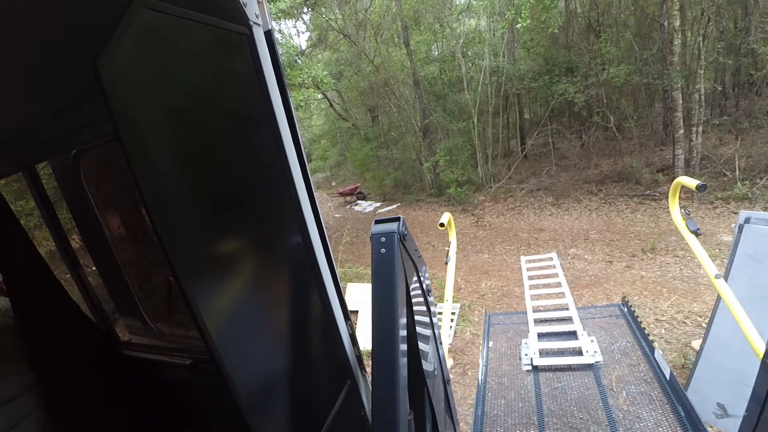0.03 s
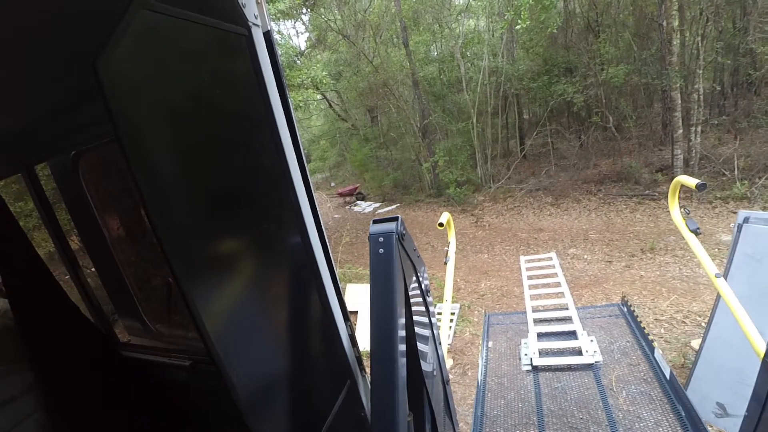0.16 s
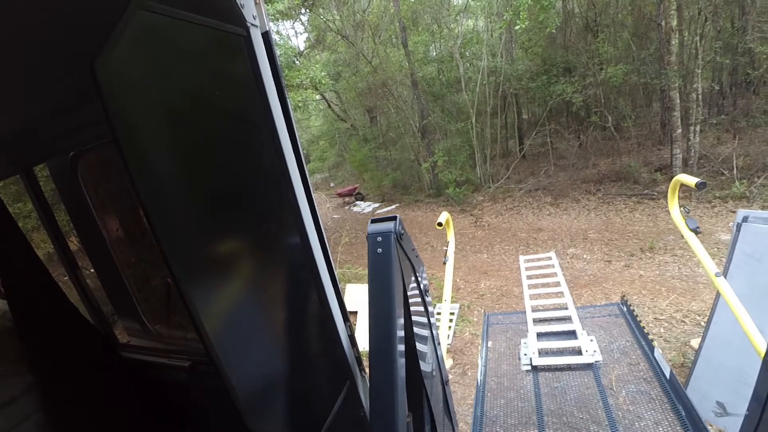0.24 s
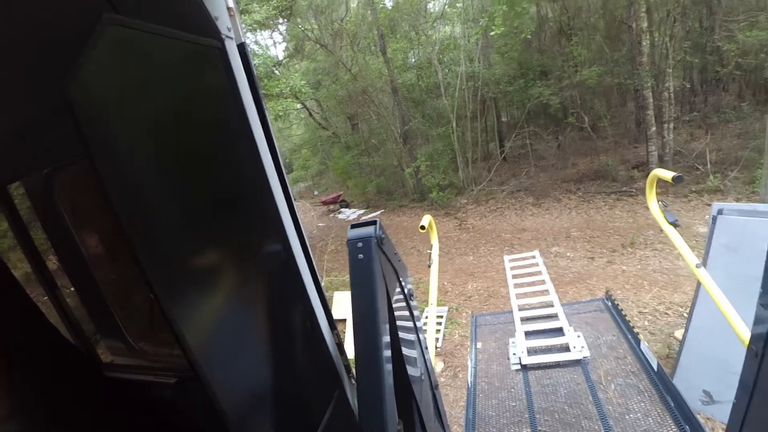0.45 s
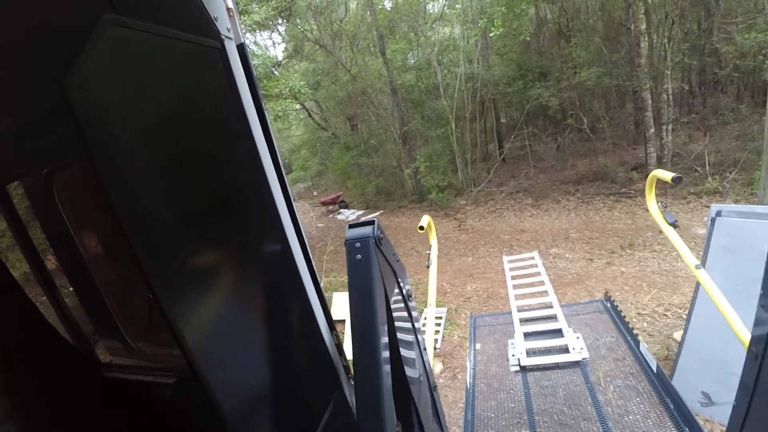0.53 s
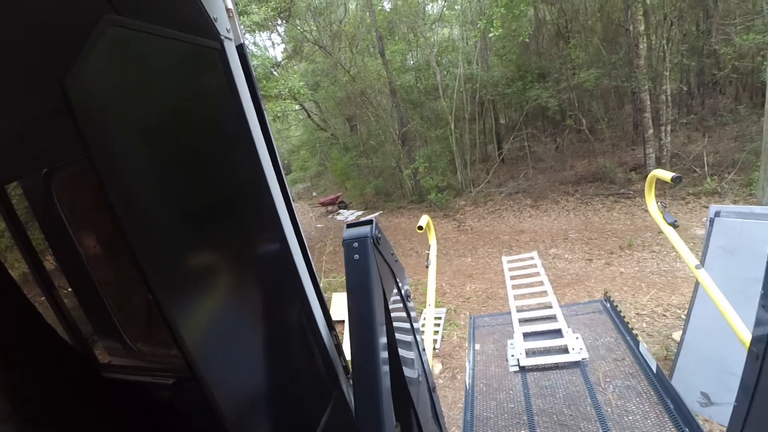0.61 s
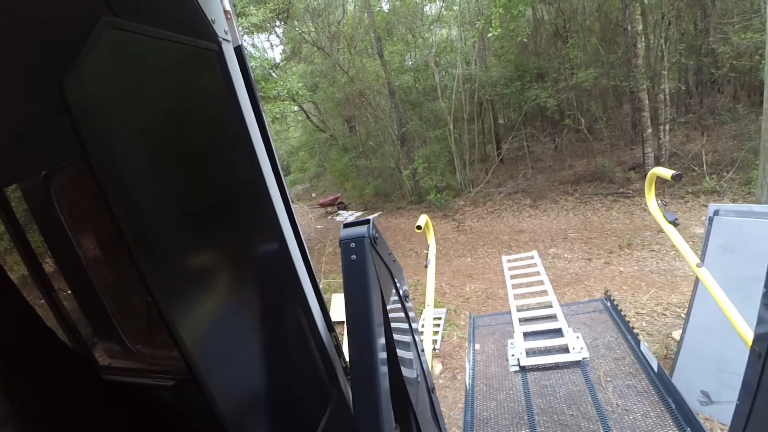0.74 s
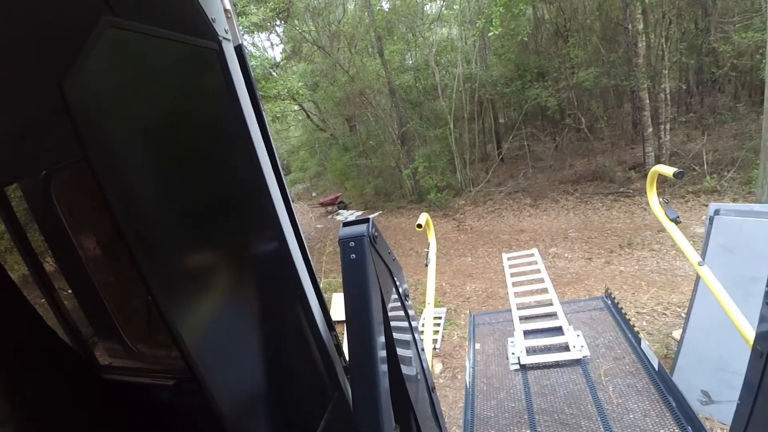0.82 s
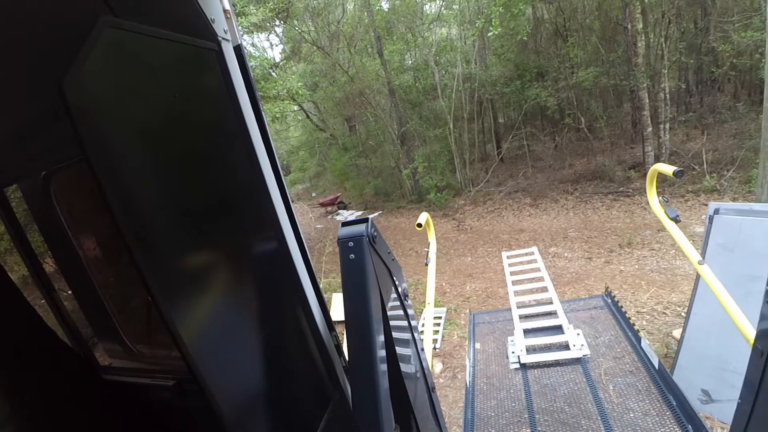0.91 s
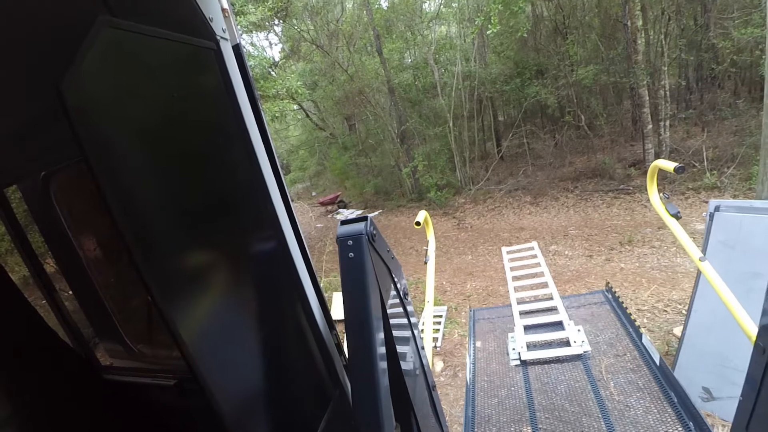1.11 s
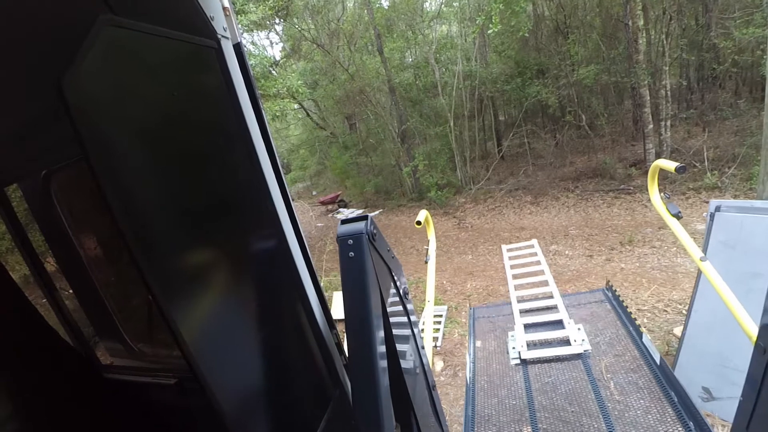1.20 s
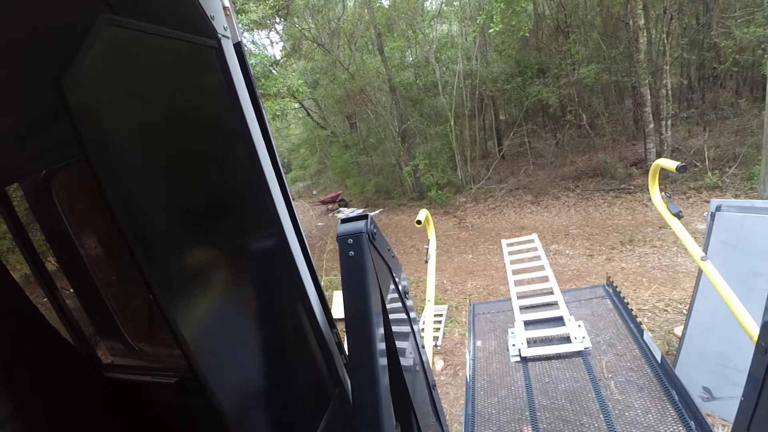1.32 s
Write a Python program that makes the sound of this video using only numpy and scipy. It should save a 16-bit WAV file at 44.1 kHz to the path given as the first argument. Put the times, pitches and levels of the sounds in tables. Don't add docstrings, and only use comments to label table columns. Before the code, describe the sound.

Electric lift motor whines up fast inside a vehicle, metal platform clunks and latch snaps, pitch sagging

```python
import sys
import numpy as np
from scipy import signal
from scipy.fft import rfft, irfft, next_fast_len
from scipy.io import wavfile
from scipy.ndimage import uniform_filter1d, map_coordinates

SR = 44100
rng = np.random.default_rng(int(sys.argv[2]) if len(sys.argv) > 2 else 0)


def materialize(psi):
    bounded = np.clip(np.atleast_2d(psi).T, -1, 1)
    quanta = np.round(bounded * 32767).astype(np.int16)
    wavfile.write(sys.argv[1], SR, quanta)


def decibels_to_gain(level_db):
    exponent = np.asarray(level_db, float) / 20
    return 10 ** exponent


N = 59535
T = np.arange(N) / SR

RUMBLE = [(8, -26), (20, -11), (45, -1), (70, -44), (200, -86)]
AIR = [(30, -1), (1000, -27), (10000, -45), (16000, -35)]
RUMBLE_DB, AIR_DB = -42.5, -56

# (start [s], level [dB], rise [s], fall t60 [s], centre [Hz])
RATTLES = [
    (.02, -46, 0.0055, 0.032, 2340),
    (0.039, -37, 0.011, 0.066, 5100),
    (0.5, -23.5, 0.0012, 0.16, 4120),
    (0.715, -29, 0.0055, 0.11, 1000),
    (.768, -38, 0.0092, 0.053, 1390),
    (0.769, -38, 0.0046, 0.043, 5030),
]
RATTLE_OCTAVES, RATTLE_GRAIN_DB = 0.99, 0.5

# (time [s], brush noise [dB], oil load [dB])
MOTOR_LOAD = [(.04, 7.5, -17), (.1, -4.5, -35.5), (.168, 1, -14), (.26, -1.5, 4.5), (.372, 3, -9),
              (.6, 1, -12), (.8, 2, -3), (.9, 1.5, -11), (1.026, -0.5, -3), (1.194, -1, -2.5),
              (1.35, 2, -5)]
# (time [s], commutator bar rate [Hz])
BAR_RATE = [(.04, 450), (.068, 960), (.1, 1560), (.126, 1950), (.168, 2390), (.208, 2634), (.26, 2795),
            (.31, 2890), (.372, 2938), (.42, 2952), (.6, 2952), (.7, 2940), (.8, 2915), (.9, 2798),
            (1.026, 2635), (1.1, 2570), (1.194, 2510), (1.35, 2488)]
# (shaft order [per turn], rms level [dB], scatter among the housing's modes [dB])
WHINE = [(11, -60, 3), (18, -68, 4), (23, -53, 2.5), (36, -55, 4), (46, -59, 4), (72, -55, 6), (81, -60, 4),
         (94, -60, 4), (108, -55, 5), (122, -62, 5), (144, -61, 6), (166, -64, 5), (180, -59, 5),
         (216, -58, 4)]
HOUSING = [(795, 35, 16), (1290, 35, 18), (1880, 50, 0), (2690, 45, 13), (8850, 90, 12), (14750, 150, 2)]
BRUSHES = [(530, -8), (900, -1), (1910, -9.5), (3540, -15.5), (8750, -12), (9400, -17.5), (15500, -15.5)]
OIL = [(900, -28), (2200, 6), (4500, 5.5), (7500, -3), (10000, -14.5)]
DRONE = [(30, -43), (60, -0.5), (150, -6), (200, -10.5), (320, -13.5), (600, -9), (1500, -58), (3300, -90)]
CABIN = [(451, 37.3, 2.5), (789.5, 19.4, -5), (1262, 20, -17), (1350, 9.2, -14), (1690, 340, -21)]
BARS = 36
START_S, START_RISE_S = 0.0363, 0.018
SPEED_LAW, NEUTRAL_ORDER = .045, 42
SHAFT_JITTER = .0003
MODE_SPACING_HZ, IDLE_HZ, SETTLE_HZ = 45, 2950, 50
BRUSH_DB, COMB_DB, OIL_DB, DRONE_DB, CABIN_DB = -39.5, 1.5, -40.5, -39, -38.5

# (time [s], level [dB], pitch [Hz], t60 [s])
SHOVES = [(.1, -38, 35, 0.13), (0.215, -20, 27.8, 0.62), (.24, -21, 95, 0.2), (0.296, -21.5, 29, 0.16),
          (.36, -19, 38, 0.52), (0.373, -29, 100, 0.44), (0.459, -25, 23.9, 0.85), (.755, -29, 28, 1),
          (0.794, -22, 20.3, 1), (0.788, -33.5, 85, 0.41), (0.892, -40, 21, 0.28), (1.092, -50, 75, 0.34)]

# (start [s], level [dB], rise [s], fall t60 [s], brightness [dB])
CLUNKS = [
    (0.212, -15.5, 0.0078, 0.091, -5.5),
    (0.244, -32.5, 0.0022, 0.27, -0.5),
    (0.287, -15.5, 0.016, 0.13, -4.5),
    (0.308, -18.5, 0.0016, 0.094, -10),
    (0.343, -25.5, 0.022, 0.23, -7),
    (0.428, -36.5, 0.025, 0.37, -15.5),
    (0.72, -31.5, 0.006, 0.19, -1.5),
    (0.766, -34.5, 0.0084, 0.083, -0.5),
    (0.499, -33.5, 0.011, 0.19, -1.5),
]
PLATFORM = [(92.6, 28, -11), (253, 14, -13.5), (338.3, 13.6, -10), (405.7, 21.3, -3), (443, 34.4, -3.5),
            (532.6, 44.4, 0.5), (587.5, 36, -3), (668, 42, -1), (733, 49.5, -2.5), (811.4, 53, -1.5),
            (855.6, 22, -4.5), (1000, 77, -15), (1194, 19, -10.5), (1590, 126, -19)]
SCRAPE = [(530, -12), (900, -3), (1340, -7), (1600, -5), (3700, -13), (4210, -13.5), (15000, -44.5)]

# (time [s], peak level [dB])
TICKS = [
    (0.3742, -7.5),
    (0.377, -13.5),
    (0.51, -20.5),
]
# (frequency [Hz], level [dB], t60 [s])
LATCH = [(3800, -2, 0.0095), (6800, -9.5, 0.0038), (6330, -34, 0.024)]

CAB_T60_S, CAB_DB = .14, -15
TOP_HZ = 15300
SIDE, SIDE_DB = [(20, 16), (60, -19), (300, -45), (400, -120)], -59


def unit(x):
    return x / np.sqrt(np.mean(x ** 2) + 1e-20)


def along(spectrum, hz):
    f, db = np.transpose(spectrum)
    return decibels_to_gain(np.interp(np.log(hz + 1), np.log(f + 1), db))


def wobble(rate):
    return map_coordinates(rng.standard_normal(size=900), [T * rate], mode="grid-wrap")


def filtered(x, response):
    m = next_fast_len(N + SR // 8)
    return irfft(rfft(x, m) * response(np.fft.rfftfreq(m, 1 / SR)), m)[:N]


def hiss(spectrum):
    return unit(filtered(rng.standard_normal(N), lambda hz: along(spectrum, hz)))


def resonant(peaks, flip=-1):
    def response(f):
        total = 0
        for k, (centre, width, db) in enumerate(peaks):
            damping = 1j * f * width
            total = total + flip ** k * decibels_to_gain(db) * damping / (centre * centre - f * f + damping)
        return total
    return response


def burst(start, db, rise, t60):
    u = T - start
    return decibels_to_gain(db - 60 * np.clip(u - rise, 0, None) / t60) * np.sqrt(np.clip(u / rise, 0, 1))


def background():
    swell = np.clip(T / 0.24, .1, 1)
    rumble = decibels_to_gain(RUMBLE_DB + 3.8 * wobble(7.7)) * swell * hiss(RUMBLE)
    return rumble + decibels_to_gain(AIR_DB) * hiss(AIR)


def rattles():
    out = np.zeros(N)
    for start, db, rise, t60, centre in RATTLES:
        bell = lambda f: np.exp(-(np.log2((f + 1) / centre) / RATTLE_OCTAVES) ** 2)
        band = unit(filtered(rng.standard_normal(N), bell))
        out += burst(start, db, rise, t60) * decibels_to_gain(RATTLE_GRAIN_DB * wobble(500)) * band
    return out


def whine(bar_hz, shaft):
    modes = rng.standard_normal(size=400)
    speed = np.clip(bar_hz / 2500, .45, 1)
    off_idle = np.clip((IDLE_HZ - bar_hz) / SETTLE_HZ, 0, 1)
    tones = np.zeros(N)
    for order, db, loose_db in WHINE:
        hz = order * bar_hz / BARS
        scatter = off_idle * map_coordinates(modes, [hz / MODE_SPACING_HZ], mode="grid-wrap")
        level = np.sqrt(2) * decibels_to_gain(db + loose_db * scatter + 1.64 * wobble(14.3))
        level = level * speed ** (SPEED_LAW * (order - NEUTRAL_ORDER))
        tones += level * np.sin(2 * np.pi * (round(order) * shaft + rng.random()))
    return tones + filtered(tones, resonant(HOUSING, flip=0.94))


def brush_noise(shaft, noise_db):
    pattern = map_coordinates(rng.standard_normal(480), [shaft * 480], mode="grid-wrap")
    rub = rng.standard_normal(N) * decibels_to_gain(1.2 * wobble(300)) + decibels_to_gain(COMB_DB) * pattern
    return decibels_to_gain(BRUSH_DB + noise_db) * unit(filtered(rub, lambda hz: along(BRUSHES, hz)))


def oil_hiss(load_db):
    return decibels_to_gain(OIL_DB + load_db + wobble(30.24)) * hiss(OIL)


def cabin_drone(noise_db, load_db):
    floor = decibels_to_gain(DRONE_DB + 0.27 * load_db) * hiss(DRONE)
    room = unit(filtered(rng.standard_normal(N), resonant(CABIN)))
    drone = floor + decibels_to_gain(CABIN_DB + 0.16 * noise_db) * room
    return drone * decibels_to_gain(1.94 * wobble(10.47))


def motor():
    s, noise, load = np.transpose(MOTOR_LOAD)
    noise_db, load_db = np.interp(T, s, noise), np.interp(T, s, load)
    bar_hz = uniform_filter1d(np.interp(T, *np.transpose(BAR_RATE)), size=800)
    shaft = np.cumsum(bar_hz) / SR / BARS + SHAFT_JITTER * wobble(37.3)
    sound = whine(bar_hz, shaft) + brush_noise(shaft, noise_db)
    sound = sound + oil_hiss(load_db) + cabin_drone(noise_db, load_db)
    return np.clip((T - START_S) / START_RISE_S, 0, 1) * sound


def shell_booms():
    booms = np.zeros(N)
    for s, db, hz, t60 in SHOVES:
        booms += burst(s, db, 0.0156, t60) * np.sin(2 * np.pi * hz * (T - s))
    return booms


def platform():
    push, edge = np.zeros(N), np.zeros(N)
    for start, db, rise, t60, bright_db in CLUNKS:
        clunk = burst(start, db, rise, t60)
        push += clunk
        edge += clunk * decibels_to_gain(bright_db)
    push = push * decibels_to_gain(1.3 * wobble(250))
    edge = edge * decibels_to_gain(2.84 * wobble(400))
    ring = filtered(push * rng.standard_normal(N), resonant(PLATFORM))
    return decibels_to_gain(23) * ring + edge * hiss(SCRAPE)


def latch_ticks():
    out = np.zeros(N)
    for s, db in TICKS:
        for hz, level, t60 in LATCH:
            out += burst(s, db + level, 0.00015, t60) * np.sin(2 * np.pi * hz * (T - s))
    return out


def cabin_echo(knocks):
    tail = rng.standard_normal(SR // 2) * decibels_to_gain(-60 * T[:SR // 2] / CAB_T60_S)
    return decibels_to_gain(CAB_DB) * signal.fftconvolve(knocks, tail / np.linalg.norm(tail))[:N]


def scene():
    knocks = rattles() + platform() + latch_ticks()
    mix = background() + motor() + shell_booms() + knocks + cabin_echo(knocks)
    return np.tile(mix, (2, 1))


def band_limit(x):
    return signal.sosfilt(signal.butter(12, 16030, fs=SR, output="sos"), x)


def record(dry):
    x = filtered(dry[0], lambda hz: .004 + 1 / (1 + (hz / TOP_HZ) ** 150))
    side = decibels_to_gain(SIDE_DB) * hiss(SIDE)
    return band_limit(np.array([x + side, x - side]))


dry = scene()
out = record(dry)
materialize(out)
```